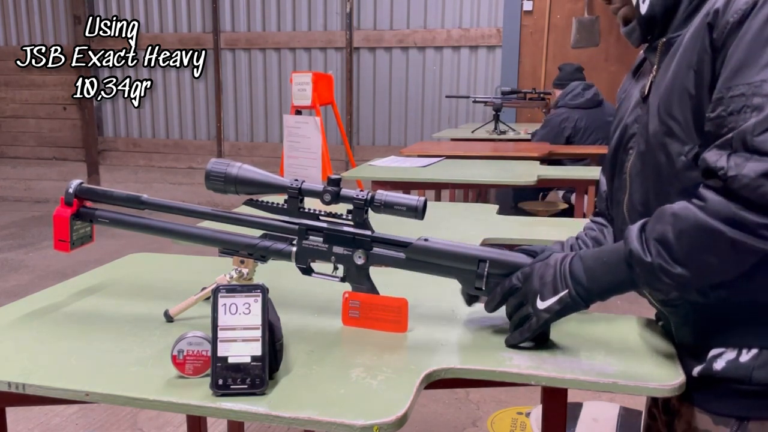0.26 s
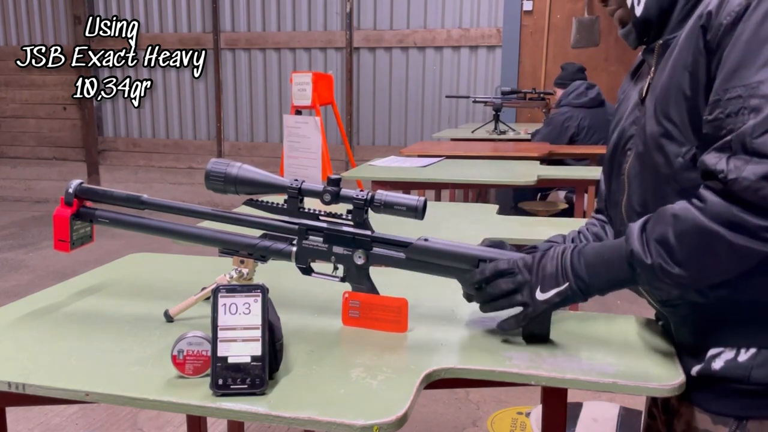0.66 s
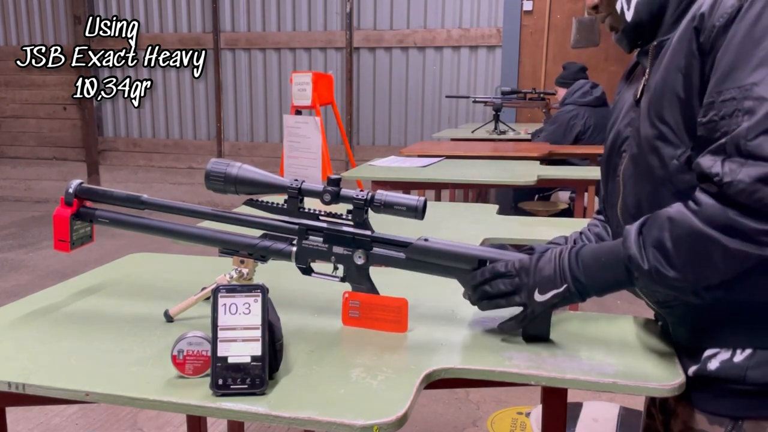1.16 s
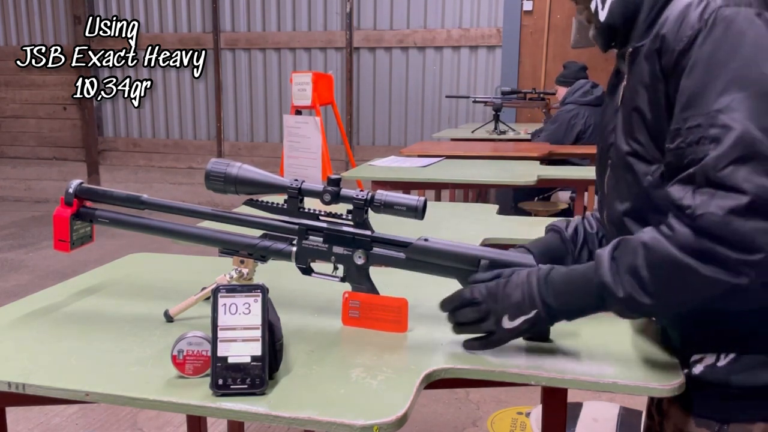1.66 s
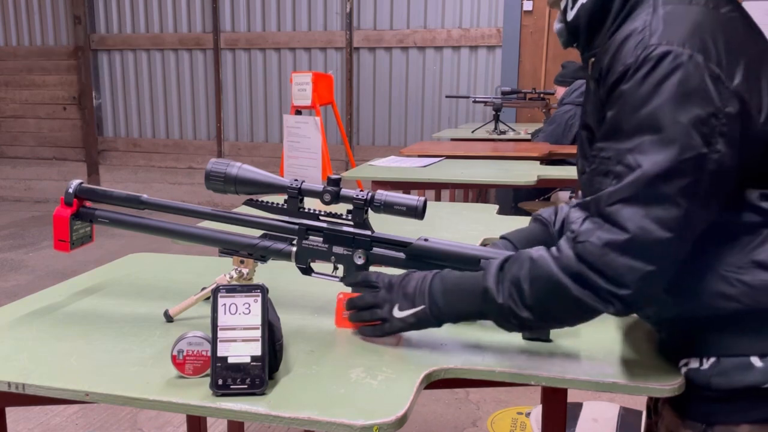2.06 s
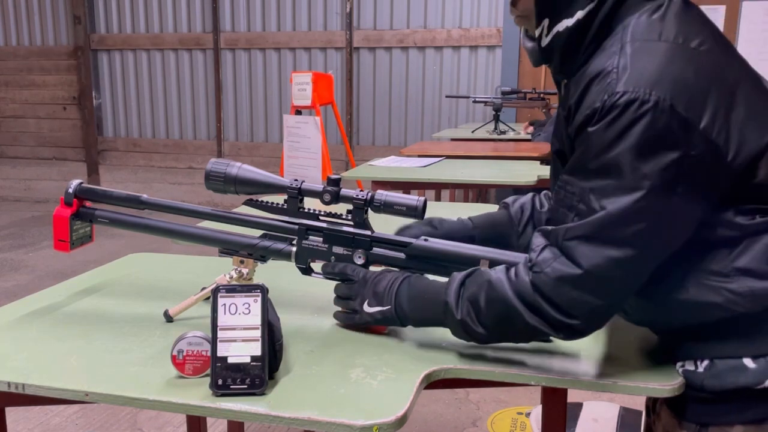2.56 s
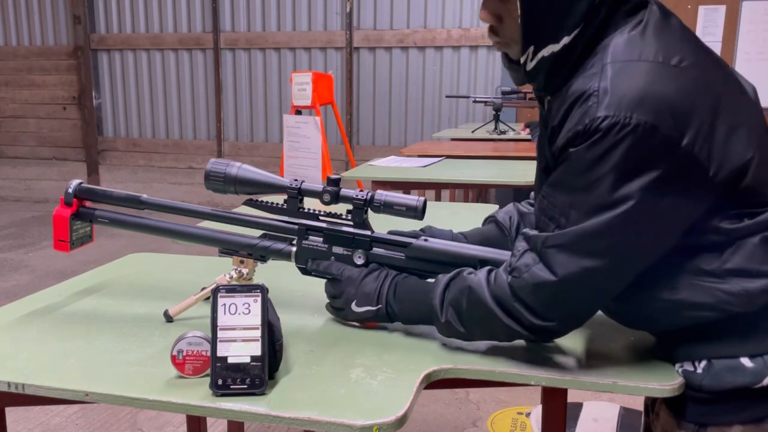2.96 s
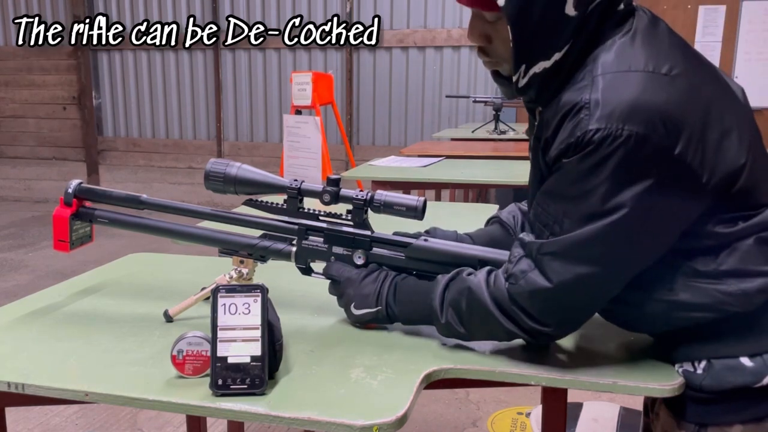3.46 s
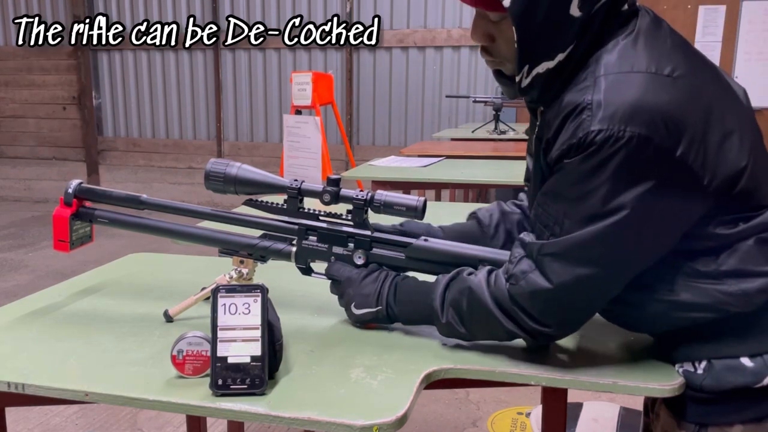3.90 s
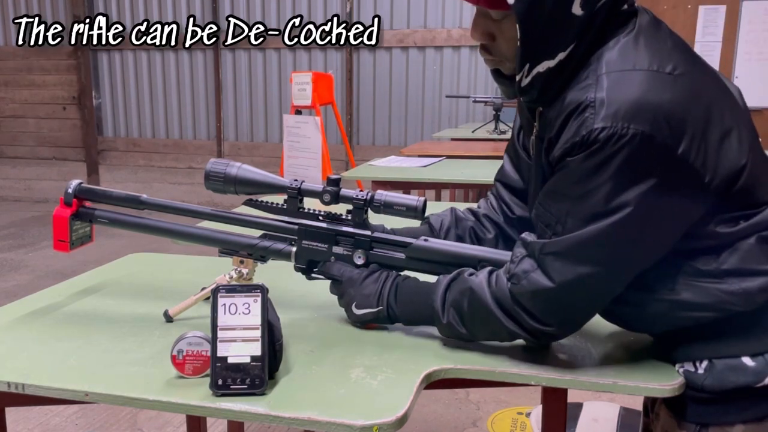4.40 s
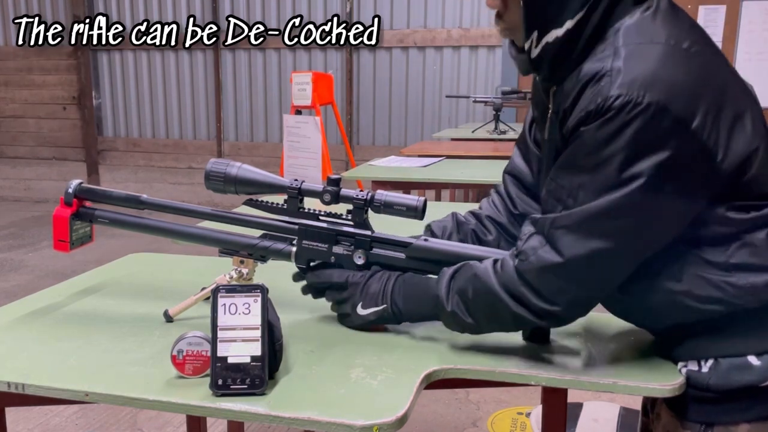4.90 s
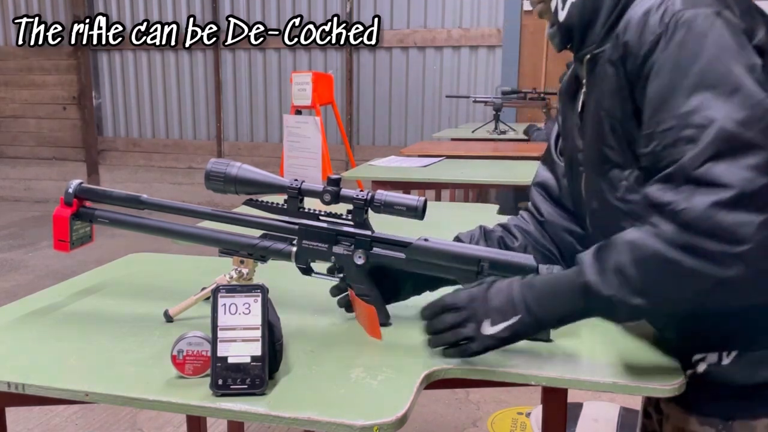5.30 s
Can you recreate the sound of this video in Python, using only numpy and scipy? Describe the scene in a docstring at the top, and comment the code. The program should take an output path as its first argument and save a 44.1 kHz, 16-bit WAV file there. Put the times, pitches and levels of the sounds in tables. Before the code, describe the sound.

Metallic clicks and cloth rustle from an air rifle on a bench, one sharp loud crack ringing through a sheet-metal hall, then more clacks.

```python
"""The action of an air rifle clicks and knocks on a bench: bursts of contacts ring damped modes.
One shot cracks and its reflection follows, both ringing the metal and a large sheet-metal hall.
Stick and slip make a sliding lever squeak faintly, and uneven contacts make spring and glove chafe.
Gloves and a nylon jacket rustle as shaped noise, over a low rumble; the hall is decaying noise
with which the near sounds are convolved."""
import sys
import numpy as np
from scipy import signal
from scipy.fft import rfft, irfft
from scipy.io import wavfile

SR = 44100
rng = np.random.default_rng(int(sys.argv[2]) if len(sys.argv) > 2 else 0)


def digitize_waveform(pressure):
    """Quantize a signal to 16-bit integers and store it at the path in sys.argv[1].

    Rows of a 2-D input are taken as channels; values are limited to [-1, 1].
    """
    field = np.atleast_2d(pressure).T
    bounded = np.clip(field, -1, 1)
    quanta = np.round(bounded * 32767).astype(np.int16)
    wavfile.write(sys.argv[1], SR, quanta)


N = 244478
TIME = np.arange(N) / SR

# Edges of the six bands that give each blow its colour, in Hz.
BLOW_EDGES_HZ = [200, 500, 1000, 2200, 4500, 9000, 15000]
# Stereo width of near sounds. Each row: frequency in Hz, side over mid in dB.
WIDTH = [(60, -15), (250, -10.5), (700, -19.5), (2000, -13), (5000, -2), (8000, -4.5), (11000, -4),
         (14000, -28)]
# Stereo width of the diffuse field. Each row: frequency in Hz, side over mid in dB.
HALL_WIDTH = [(60, -16.5), (250, -9), (600, 1), (2000, -0.5), (5000, -4), (8000, -3), (11000, -5.5),
              (14000, -27.5)]
# Movements of arms and hands. Each row: time of the height in seconds, length in seconds,
# swish level in dB, nylon hiss level in dB.
MOVES = [(0.002, 0.33, -69, -77), (0.638, 0.36, -89, -79), (0.848, 0.059, -62, -77),
         (1.044, 0.34, -63.5, -65.5), (1.367, 0.96, -65, -73.5), (1.57, 1, -69, -71),
         (1.887, 0.6, -93, -73.5), (2.32, 0.96, -62.5, -68.5), (2.814, 0.13, -48, -48.5),
         (2.943, 0.2, -48.5, -56), (3.307, 0.42, -58, -76), (3.87, 0.32, -60.5, -70),
         (4.18, 0.22, -67.5, -78.5), (4.905, 0.24, -59.5, -62), (5.062, 0.43, -57.5, -66.5),
         (5.29, 0.51, -65, -68.5)]


def from_db(db):
    """Level law: decibels to amplitude gain."""
    return 10 ** (np.asarray(db) / 20)


def rms_one(x):
    """Power normalisation: scale to unit rms."""
    return x / np.sqrt(np.mean(x ** 2) + 1e-20)


def in_time(rows):
    """Linear interpolation: each column of a curve at every sample."""
    s, *columns = np.transpose(rows)
    return [np.interp(TIME, s, column) for column in columns]


def at_hz(points, hz, axis=1):
    """Interpolation by pitch interval: one column of a table read on a log-frequency axis."""
    points = np.array(points)
    return np.interp(np.log(hz), np.log(points[:, 0]), points[:, axis])


def band(x, low, high, order=2):
    """Band limiting by a causal Butterworth band-pass."""
    sos = signal.butter(order, [low, min(high, .45 * SR)], "band", fs=SR, output="sos")
    return signal.sosfilt(sos, x)


def drift(rate_hz):
    """Slow random modulation: low-passed noise with unit rms."""
    run_in = SR // 4
    sos = signal.butter(2, rate_hz, fs=SR, output="sos")
    return rms_one(signal.sosfilt(sos, rng.standard_normal(N + run_in))[run_in:])


def stereo(pair, side_db):
    """Mid-side decomposition: two signals become left and right, keeping the power."""
    side = from_db(side_db)
    return (pair[0] + side * pair[1] * np.array([[1], [-1]])) / np.hypot(1, side)


def noise_bands(size, width):
    """Random noise split into half-octave stereo bands, each with its centre frequency."""
    edges = np.geomspace(22, 17000, 20)
    white = rng.standard_normal((2, 2, size))
    for k, (low, high) in enumerate(zip(edges, edges[1:])):
        hz = np.sqrt(low * high)
        yield hz, stereo(band(white[k % 2], low, high), at_hz(width, hz))


def coloured(spectrum, width):
    """Spectral shaping: weighted noise bands add to stereo noise with unit rms."""
    return rms_one(sum(from_db(at_hz(spectrum, hz)) * noise for hz, noise in noise_bands(N, width)))


def action_clicks():
    """Impact: parts of the action meet; a light part rings high, a padded contact loses its treble."""
    # Each row: start in seconds, level in dB before the shared colour, centre in Hz, treble loss in
    # dB per octave, rattle decay constant in milliseconds, hall send in dB.
    contacts = [(.2503, -37.5, 2940, -2, 0.26, -1), (.2504, -38.5, 1000, 1.5, 0.52, -4),
                (.2692, -45.5, 1560, 0.5, 0.55, -5.5), (.2708, -51, 2380, -3, 1.3, -11),
                (.709, -50.5, 3070, 12.5, 1.9, -0.5), (.8505, -63, 4100, 3.5, 7.3, -2),
                (.861, -51.5, 2500, 17, 4.1, 4), (.8703, -45, 2240, 12.5, 7.2, -1),
                (.878, -53, 580, 6.5, 4, 4), (1.4533, -62.5, 4460, -1, 1.7, 1),
                (1.473, -64.5, 4490, 0, 0.45, -20), (1.4892, -64, 5950, -2, 1.13, -17),
                (1.5685, -36.5, 1200, 4, 3.7, 1.5), (1.738, -53, 734, 19, 11, 1),
                (1.7945, -49, 1892, 51, 1.2, 10.5), (2.557, -36.5, 1460, 6.5, 2, -25),
                (3.139, -51, 1590, 6, 1.7, 6.5), (3.292, -50, 480, 1.1, 2.7, -4),
                (3.7645, -61, 1000, 1.5, 1.74, 3), (4.0997, -54, 4930, 21, 1.95, 2),
                (4.5785, -34, 2450, -1, 1.15, -1.5), (4.584, -44.5, 2860, 8, 2.1, 1),
                (4.8945, -51, 4900, 32, 1.5, 10.5), (4.9165, -34, 1740, 10.5, 8.6, -28),
                (4.9225, -29.5, 1730, 5, 1.8, -8), (4.9305, -44, 1500, 11, 1.5, -24),
                (5.0142, -40.5, 2010, 11, 2.9, -5), (5.022, -43.5, 1530, 22, 1.3, -18),
                (5.067, -50.5, 1210, 10, 2.8, -23), (5.37, -59, 5000, 4, 1.4, -17)]
    # small parts radiate ever less below their centre: 7 dB per octave
    return blows(contacts, 7, ring_db=-30.5, snap_ms=0.045, grain_db=7.0, ring_send_db=-11.5)


def shot_blasts():
    """Impulsive radiation: the shot's crack, then its first reflection, each with its hall send."""
    # Each row: start in seconds, level in dB before the shared colour, centre in Hz, treble loss in
    # dB per octave, blast decay constant in milliseconds, hall send in dB.
    blasts = [(2.3016, -17, 1870, 1.66, 1.5, 3), (2.3053, -21.5, 1506, 1, 1.9, 3.5)]
    bass_loss = 11  # dB per octave
    crack = blows(blasts[:1], bass_loss, ring_db=-53.0, snap_ms=0.8, grain_db=3.5, ring_send_db=-26.0)
    bounce = blows(blasts[1:], bass_loss, ring_db=-48.5, snap_ms=0.65, grain_db=9.0, ring_send_db=-21.0)
    return crack, bounce


def blows(rows, bass_loss, ring_db, snap_ms, grain_db, ring_send_db):
    """Forced modal response: a snap and dying burst ring the rifle; gives near sound and hall send."""
    near, send = np.zeros((2, N)), np.zeros(N)
    t = np.arange(SR // 8) / SR
    attack = t < .0055
    for s, level_db, centre_hz, treble_loss, burst_ms, send_db in rows:
        levels = blow_colour(level_db, centre_hz, treble_loss, bass_loss)
        burst = contact_burst(t, burst_ms, grain_db)
        # the shorter the contact, the more of it is one clean snap
        burst[0, round(.0003 * SR)] -= snap_ms / burst_ms
        pair, hit = rifle_ring(burst, ring_db), 0
        for low, high, db in zip(BLOW_EDGES_HZ, BLOW_EDGES_HZ[1:], levels):
            part = band(pair, low, high, order=3)
            # each band's level holds for its attack
            part /= part[:, attack].std(axis=1, keepdims=True)
            hit = hit + from_db(db) * stereo(part, at_hz(WIDTH, np.sqrt(low * high)))
        i, pulse = round(s * SR), hall_pulse(levels)
        near[:, i:i + len(t)] += hit[:, :N - i]
        send[i:i + len(t)] += from_db(send_db + ring_send_db) * hit[0, :N - i]
        send[i:i + len(pulse)] += from_db(send_db) * pulse
    return near, send


def blow_colour(db, centre_hz, treble_loss, bass_loss):
    """Spectral envelope: band levels fall by so many dB per octave either side of a blow's centre."""
    # Colour shared by all blows, in dB, one value for each band.
    shared_db = [0, -0.5, -1.1, -1.1, -0.65, 0.98]
    edges = np.array(BLOW_EDGES_HZ)
    octaves = np.log2(np.sqrt(edges[1:] * edges[:-1]) / centre_hz)
    slopes = bass_loss * np.minimum(octaves, 0) - treble_loss * np.maximum(octaves, 0)
    return db + np.array(shared_db) + slopes


def contact_burst(t, burst_ms, grain_db, count=4):
    """Broadband excitation: a dying burst of tiny contacts, its spectrum flattened so others colour it."""
    fade = np.exp(-t * 1000 / burst_ms) + 1e-12
    burst = rng.standard_normal((2, len(t))) * from_db(grain_db * rng.standard_normal(len(t))) * fade
    for _ in range(count):
        spectrum = rfft(burst)
        flatter = irfft(spectrum / np.sqrt(np.abs(spectrum) + 1e-12), len(t))
        burst = flatter * np.minimum(10 * fade, 1)
    return burst / np.linalg.norm(burst, axis=1, keepdims=True)


def rifle_ring(force, ring_db):
    """Modal superposition: the force plus the modes it drives, each blow exciting them differently."""
    # Frame and action. Each row: frequency in Hz, relative level in dB before a random spread,
    # 60 dB decay time in seconds.
    modes = [(420, -11.5, 0.07), (616, -14, 0.076), (1100, -17.5, 0.043), (1320, -5, 0.034),
             (1950, -4.5, 0.0048), (2640, 6, 0.0052), (3200, 15.5, 0.0058), (4077, -28.5, .025),
             (6760, 4.5, 0.0092), (11200, 4.5, 0.012), (12700, 2.5, .005)]
    out = force.copy()
    for hz, db, t60 in modes:
        r, w = from_db(-60 / (t60 * SR)), 2 * np.pi * hz / SR
        ring = signal.lfilter([1, -r * np.cos(w)], [1, -2 * r * np.cos(w), r * r], force)
        out += from_db(ring_db + db + rng.normal(0, 2)) * ring
    return out


def hall_pulse(levels, size=1024):
    """Diffuse-field excitation: a hall gathers all directions, so hears only a blow's smooth outline."""
    edges = np.array(BLOW_EDGES_HZ)
    hz = np.maximum(np.fft.rfftfreq(size, 1 / SR), 1)
    density = from_db(levels) * SR * np.sqrt(.0055 / (2 * np.diff(edges)))
    log_centres = np.log(edges[1:] * edges[:-1]) / 2
    outline = np.exp(np.interp(np.log(hz), log_centres, np.log(density)))
    return np.roll(irfft(outline * hz / np.hypot(hz, edges[0] / 2)), size // 16)


def long_ring(modes, hits):
    """Free damped vibration: modes ring on after each hit, a little differently left and right."""
    out = np.zeros((2, N))
    for s, db in hits:
        i = round(s * SR)
        t = TIME[:min(SR, N - i)]
        for hz, level, t60 in modes:
            phase = from_db(at_hz(WIDTH, hz)) * rng.standard_normal((2, 1))
            tone = np.sin(2 * np.pi * hz * t + phase)
            out[:, i:i + SR] += from_db(db + level - 60 * t / t60) * tone * (1 - np.exp(-hz * t))
    return out


def small_parts():
    """Free vibration of small parts: catch, stock, lever, bolt and shroud each sound their own modes."""
    # Modes, each row: frequency in Hz, relative level in dB, 60 dB decay time in seconds.
    # Hits, each row: start in seconds, level in dB.
    catch_modes = [(645, 3, .03), (1020, -2, .02), (1400, -1, .017), (1760, -14, .15), (2750, 5, .009),
                   (3100, 3, .009), (3480, 5, .01), (5093, -8, .012), (7000, -8, .015), (12800, 12, .004)]
    catch_hits = [(0.2508, -34), (.271, -39)]
    stock_modes = [(332, -4.5, 0.13), (584, -7.5, 0.28), (840, -2, .04), (1034, -10, 0.48),
                   (1134, 6.5, 0.06), (1350, -0.5, 0.035), (2000, 3, 0.028), (3200, -1, .015),
                   (5900, -6.5, .012), (7700, -6.5, .012)]
    stock_hits = [(0.882, -68), (1.571, -39.5)]
    lever_modes = [(387, -6, 0.046), (1380, -4.5, 0.037), (1576, 2.5, .07), (1964, 10, 0.03),
                   (2030, -12, 0.39), (3170, 12, 0.013)]
    lever_hits = [(4.923, -38), (5.015, -48.5)]
    bolt_modes = [(400, -25, .02), (690, -18, .02), (1480, -13, .013), (1720, -12, .013), (2850, -2, .009),
                  (3250, 0, .01), (4150, -7, .011), (12000, -4, .003)]
    bolt_hits = [(4.579, -20.5)]
    # the air blast rings the barrel shroud for a moment
    shroud_modes = [(420, -17, 0.023), (1170, -7.5, 0.03), (1411, -7, .012), (2120, 3, 0.0089),
                    (2930, -0.5, 0.017), (3650, -3, .008), (4420, -5, 0.0083), (13200, -6.5, 0.0025)]
    shroud_hits = [(2.3018, -17), (2.3055, -16)]
    parts = long_ring(catch_modes, catch_hits) + long_ring(stock_modes, stock_hits)
    parts += long_ring(lever_modes, lever_hits) + long_ring(bolt_modes, bolt_hits)
    return parts + long_ring(shroud_modes, shroud_hits)


def bench_and_steel():
    """Modal ringing: heavier blows shake the bench and set barrel and air tube singing."""
    # Each row: start in seconds, bench level in dB, steel level in dB.
    thumps = [(0.252, -80, -60), (1.571, -52, -88), (2.303, -33.5, -38), (4.58, -50.5, -73),
              (4.924, -49.5, -62)]
    # Bench top. Each row: frequency in Hz, relative level in dB, 60 dB decay time in seconds.
    bench_modes = [(60, -8.5, 0.43), (94, 1.5, 0.096), (127, 5, 0.098), (165.6, -11, 0.41),
                   (213.3, -14, 0.98), (332, -1, 0.21), (440, -7, 0.22), (581, -6, 0.2)]
    # Barrel and air tube. Each row: frequency in Hz, relative level in dB, 60 dB decay time in seconds.
    steel_modes = [(1103, 2, .45), (1330, -2, .7), (1538, -3, .9), (1636, -5, 1), (1678, -4, .9),
                   (1771, -4, .8), (1870, -4, .9), (2016, 0, .35), (2328, -4, .6), (2631, -9, .8),
                   (2791, -5, .9), (3249, -6, .3), (3792, -4, .6), (4001, -2, .7), (5077, -8, .25),
                   (5272, -6, .55)]
    thumps = np.array(thumps)
    return long_ring(bench_modes, thumps[:, [0, 1]]) + long_ring(steel_modes, thumps[:, [0, 2]])


def chafe(peaks, pulls, surge_db, grit_db, side_db, bend, dry_db):
    """Friction excitation: uneven contacts sound resonances that shift and waver; pulls swell and let go."""
    swell_db = 19  # gained during the rise, lost during the release
    contacts = rng.standard_normal((2, N)) * from_db(surge_db * drift(90) + grit_db * drift(900))
    ring = sum(from_db(db) * band(contacts, hz - width / 2, hz + width / 2) for hz, width, db in peaks)
    ring = ring + from_db(dry_db) * band(contacts, 1700, 4200)
    swells = []
    for s, db, rise, release, _ in pulls:
        distance = np.maximum((s - TIME) / rise, (TIME - s) / release)
        swells.append(from_db(db - swell_db * distance))
    power = np.array(swells) ** 2 + 1e-20
    # reading the ring faster or slower shifts its resonances by the pitch ratio of the loudest pull
    speed = np.array(pulls)[:, -1] @ power / power.sum(axis=0) * (1 + bend * drift(30))
    ring = np.array([np.interp(np.cumsum(speed) % N, np.arange(N), side) for side in ring])
    return np.sqrt(power.sum(axis=0)) * rms_one(stereo(ring, side_db))


def spring_rattle():
    """Resonant contact noise: the latch spring rattles on after it is let go."""
    # Each row: frequency in Hz, width in Hz, relative level in dB.
    peaks = [(1790, 130, -0.5), (2440, 330, -3.5), (3680, 150, -2), (3910, 160, -7.5), (5040, 320, -11),
             (6350, 200, -5.5)]
    # Each row: time of the height in seconds, level in dB, rise and release in seconds, pitch ratio.
    rattles = [(4.606, -56.5, 0.044, 0.096, 1.0), (4.642, -56.5, 0.04, 0.33, 1.0)]
    return chafe(peaks, rattles, surge_db=4.5, grit_db=9.0, side_db=-4.0, bend=0.0033, dry_db=-19)


def lever_squeak(blur_hz=45, blur=0.5, catch_db=3.0, scrape_db=-17, jitter=0.04):
    """Stick and slip: a wavering tone rises with the lever's speed and catches; a dry scrape joins it."""
    # Each row: time in seconds, pitch in Hz before jitter, level in dB before the catching.
    glide = [(3.785, 640, -68), (3.808, 626, -53), (3.82, 640, -55), (3.838, 676, -52), (3.846, 823, -55),
             (3.866, 841, -59.5), (3.88, 780, -70), (3.89, 746, -79)]
    # Each row: multiple of the pitch, relative level in dB.
    partials = [(1, -3), (2, -6.5), (3, -21), (4, -18)]
    pitch, db = in_time(glide)
    phase = 2 * np.pi * np.cumsum(pitch * (1 + jitter * drift(121.5))) / SR
    pair = np.zeros((2, N))
    for tone in pair:
        for k, level in partials:
            wave = np.sin(k * phase + rng.uniform(0, 2 * np.pi))
            tone += from_db(level) * (1 + blur * drift(blur_hz)) * wave
    scrape = rms_one(band(rng.standard_normal((2, N)), 1900, 4400))
    pair = np.sqrt(2) * pair + from_db(scrape_db) * scrape
    sliding = (TIME > glide[0][0]) & (TIME < glide[-1][0])
    return sliding * from_db(db + catch_db * drift(150)) * stereo(pair, -16.0)


def slot_scrape():
    """Sliding friction: the lever scrapes along its slot."""
    # Each row: frequency in Hz, width in Hz, relative level in dB.
    peaks = [(878, 184, -1), (1263, 172, 0.5), (1482, 164, 3), (1900, 200, -10), (3380, 730, -20.5)]
    # Each row: time of the height in seconds, level in dB, rise and release in seconds, pitch ratio.
    strokes = [(3.777, -63, 0.02, 0.045, 1.05), (3.852, -54.5, 0.083, 0.043, .97),
               (3.869, -52.5, 0.0095, .015, 0.94), (3.93, -59, 0.0394, 0.077, 1.07),
               (3.998, -61.5, 0.022, 0.034, .96)]
    return chafe(peaks, strokes, surge_db=1.5, grit_db=2.0, side_db=-18.5, bend=0.01513, dry_db=-16.5)


def glove_rub():
    """Sliding friction: a glove dragged over the stock excites its resonances."""
    # Each row: frequency in Hz, width in Hz, relative level in dB.
    peaks = [(1500, 400, -4), (1860, 420, 0), (2320, 420, -0.5), (3150, 600, -15), (3900, 400, -11),
             (4700, 450, -15)]
    # Each row: time of the hardest pull in seconds, level in dB, rise and release in seconds, pitch ratio.
    rubs = [(1.187, -59.5, 0.012, 0.035, 0.77), (1.218, -55.5, 0.021, 0.045, 1.01),
            (1.239, -58, .018, 0.024, 0.77), (1.254, -52.5, 0.031, 0.05, 1.03),
            (1.27, -51, .028, 0.02, 1.04), (1.28, -55.5, 0.011, .04, 1.02),
            (1.335, -60.5, .0806, 0.024, 1.02)]
    return chafe(peaks, rubs, surge_db=0.5, grit_db=5.5, side_db=-10.5, bend=0.013, dry_db=-15)


def sleeve_scuff():
    """Broadband friction: the sleeve scuffs across the bench with broad peaks."""
    # Each row: frequency in Hz, width in Hz, relative level in dB.
    peaks = [(2020, 300, 2), (2800, 1460, 7), (4310, 800, -14)]
    # Each row: time of the height in seconds, level in dB, rise and release in seconds, pitch ratio.
    sweeps = [(5.238, -56.5, 0.062, 0.25, 0.96)]
    return chafe(peaks, sweeps, surge_db=1.0, grit_db=-2.0, side_db=-3.5, bend=0.01013, dry_db=-3)


def movement(s, length):
    """Speed envelope: a limb gathers speed up to its height, then comes slowly to rest."""
    rise_share, fall_db = 0.27, 19  # share of the length for the rise; dB lost over one length after
    progress = (TIME - s) / length
    return np.exp(-np.minimum(progress / rise_share, 0) ** 2) * from_db(-fall_db * np.maximum(progress, 0))


def cloth():
    """Friction noise adding in power: sleeves swish with each movement, nylon weave adds grainy hiss."""
    # Swish spectrum. Each row: frequency in Hz, relative level in dB.
    swish_spectrum = [(100, -26.5), (300, -14), (700, 10), (1500, 3), (2500, 2), (4500, -17), (8000, -33.5),
                      (15000, -49)]
    # Hiss spectrum. Each row: frequency in Hz, relative level in dB.
    hiss_spectrum = [(100, -33), (2000, 0.5), (4500, -4), (7000, 2), (9000, -9), (11000, 7.5), (13300, 3),
                     (15500, -9.5)]
    # the jacket is never quite at rest: swish and hiss floors in dB
    power = from_db([[-86.5], [-87.5]]) ** 2
    for s, length, swish_db, hiss_db in MOVES:
        power = power + (from_db([[swish_db], [hiss_db]]) * movement(s, length)) ** 2
    swish_gain, hiss_gain = np.sqrt(power)
    swish = swish_gain * from_db(0.7 * drift(39)) * coloured(swish_spectrum, HALL_WIDTH)
    grain = from_db(0.71 * drift(40) + 0.77 * drift(600))
    hiss = hiss_gain * grain * coloured(hiss_spectrum, WIDTH)
    return swish + hiss


def crinkles(level_db, per_s=16, spread_db=1.0):
    """Random impulses: a nylon fold or glove seam flicks over, more often while the arms move."""
    busy = np.clip(sum(movement(s, length) for s, length, _, _ in MOVES), .1, 1)
    sizes = from_db(spread_db * np.minimum(rng.exponential(1, N), 2))
    flicks = (rng.random(N) < per_s * busy / SR) * sizes
    fade = np.exp(-TIME[:SR // 20] / 0.0015)
    envelope = np.convolve(flicks, fade)[:N]
    rustle = stereo(band(rng.standard_normal((2, N)), 1100, 4800, order=1), -4.0)
    return from_db(level_db) * envelope * rms_one(rustle)


def hall(x, early_db=5.5, early_t60=0.48, build_s=0.00064, flutter_db=1.0, bunch_db=1.0):
    """Reverberation by convolution: bench, wall and roof answer first and die fast; the hall rings on."""
    # Each row: frequency in Hz, 60 dB decay time in seconds, relative tail level in dB.
    decay = [(103.4, 0.58, 7), (244, 4.2, 4), (567, 2.2, 2.5), (1220, 2.53, -3), (2580, 1.63, -2.5),
             (4860, 1.31, -4.5), (7900, 0.6, -2.5), (13100, 0.53, -14.5)]
    # Echo clusters from roof and far walls. Each row: delay and spread in seconds, dB over the tail.
    echoes = [(0.028, 0.0062, 1), (.08, .015, 0)]
    # Broad resonances of the sheet-metal walls. Each row: frequency in Hz, width in Hz, boost in dB.
    wall_peaks = [(700, 120, 2), (1130, 120, 1.5), (1660, 260, 4.5), (4000, 600, 1.5)]
    bunch_s = .012  # within each band the echoes bunch and thin out this often
    t = np.arange(2 * SR) / SR
    early = from_db(early_db - 60 * t / early_t60)
    response = 0
    for hz, noise in noise_bands(len(t), HALL_WIDTH):
        late = from_db(-60 * t / at_hz(decay, hz))
        bunching = np.interp(t / bunch_s, np.arange(400), rng.standard_normal(400))
        level = from_db(at_hz(decay, hz, axis=2) + bunch_db * bunching)
        response = response + noise * level * np.hypot(early, late)
    for hz, width, db in wall_peaks:
        resonance = band(response, hz - width / 2, hz + width / 2, order=1)
        response = response + (from_db(db) - 1) * resonance
    # reflections off the flat walls arrive in clumps
    clusters = sum(db * np.exp(-((t - delay) / spread) ** 2) for delay, spread, db in echoes)
    flutter = flutter_db * drift(160)[:len(t)]
    response *= (1 - np.exp(-t / build_s)) * from_db(-40.0 + clusters + flutter)
    return signal.fftconvolve(x.mean(axis=0)[None], response, axes=1)[:, :N]


def low_rumble():
    """Stationary random noise: a steady low rumble shaped by its spectrum."""
    # Each row: frequency in Hz, relative level in dB.
    spectrum = [(25, -21.5), (45, -1), (62, 1), (100, -5), (160, -12), (300, -19.5), (700, -22.5),
                (2000, -42.5), (6000, -66), (15000, -47)]
    return from_db(-59.5) * coloured(spectrum, HALL_WIDTH)


def scene():
    """Superposition: action, shot and friction near the microphone, the hall behind them."""
    clicks, click_send = action_clicks()
    (crack, crack_send), (bounce, bounce_send) = shot_blasts()
    ringing = bench_and_steel()
    parts = small_parts()
    spring = spring_rattle()
    friction = glove_rub() + sleeve_scuff() + slot_scrape() + lever_squeak()
    send = click_send + crack_send + from_db(-8) * parts[0] + from_db(-3.5) * friction[0]
    # the shot's reflection travels round the hall by paths of its own
    room = hall(send[None]) + hall(bounce_send[None])
    near = clicks + crack + bounce + ringing + parts + spring + friction
    return near + room + cloth() + crinkles(level_db=-71.0) + low_rumble()


def record(dry, notch_hz=8900, notch_q=1.5, low_hz=38, top_hz=13800, left_db=.5):
    """Interference: near 9 kHz two ports hear opposite phase, so their sum dips; both range ends roll off."""
    mid, side = (dry[0] + dry[1]) / 2, (dry[0] - dry[1]) / 2
    mid = signal.lfilter(*signal.iirnotch(notch_hz, notch_q, fs=SR), mid)
    ported = np.array([mid + side, mid - side]) * from_db([[left_db], [-left_db]])
    ported = signal.sosfilt(signal.butter(2, low_hz, "high", fs=SR, output="sos"), ported)
    ported = signal.sosfilt(signal.butter(8, top_hz, fs=SR, output="sos"), ported)
    # steep cutoff at 16 kHz
    return signal.sosfilt(signal.ellip(10, .2, 80, 16000, fs=SR, output="sos"), ported)


dry = scene()
out = record(dry)
digitize_waveform(out)
```